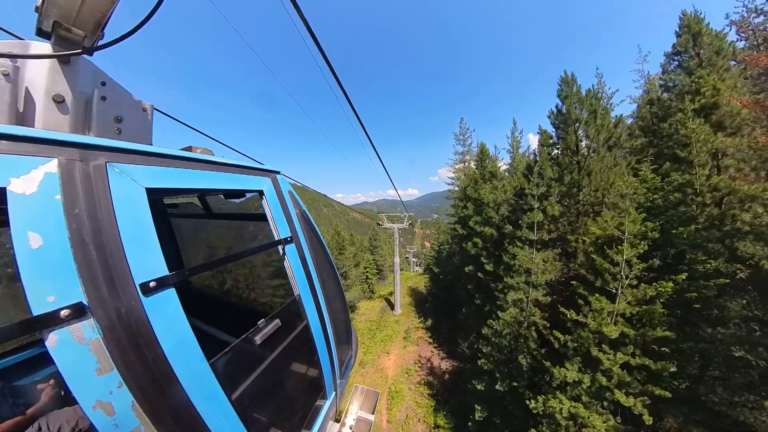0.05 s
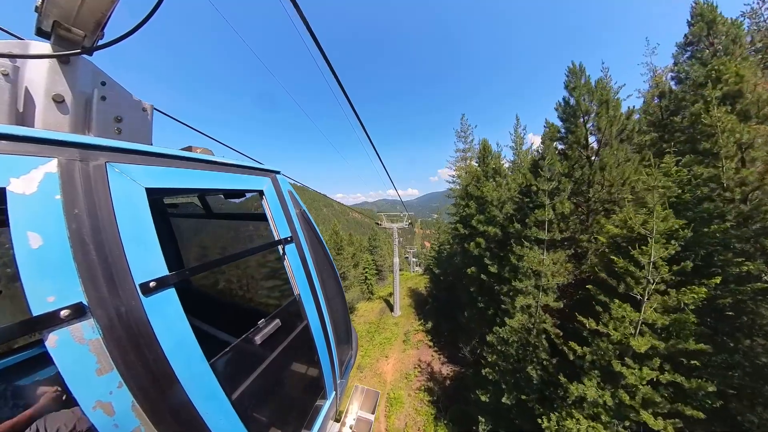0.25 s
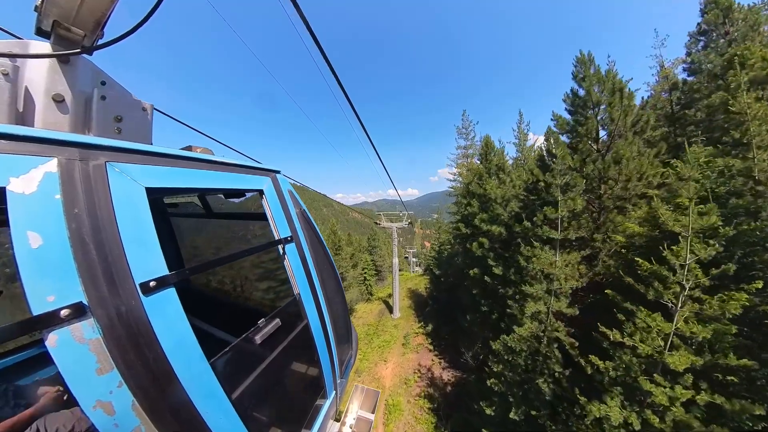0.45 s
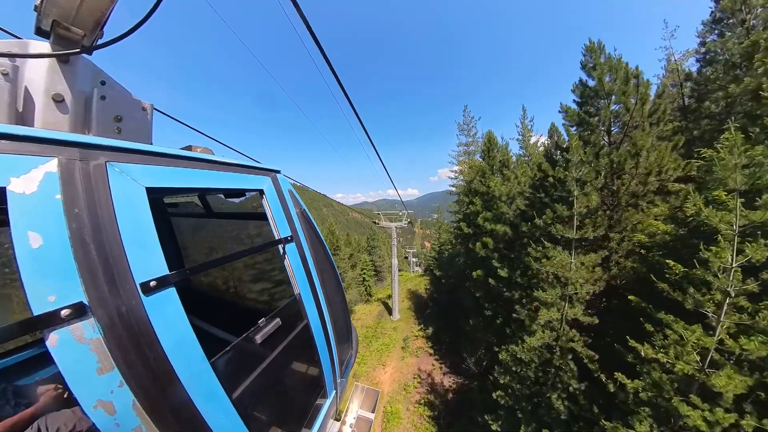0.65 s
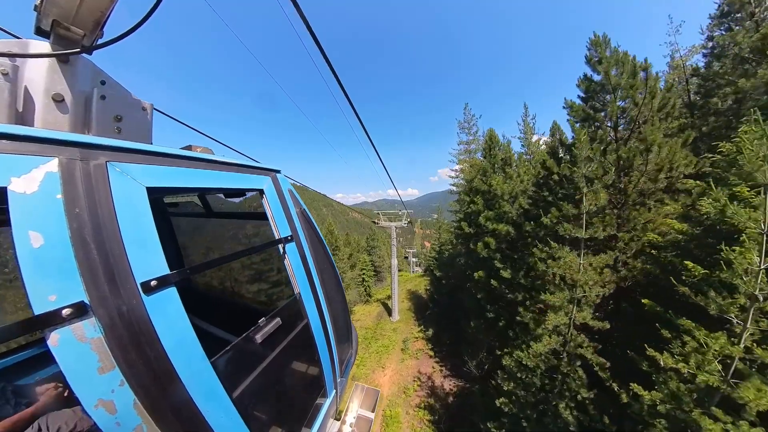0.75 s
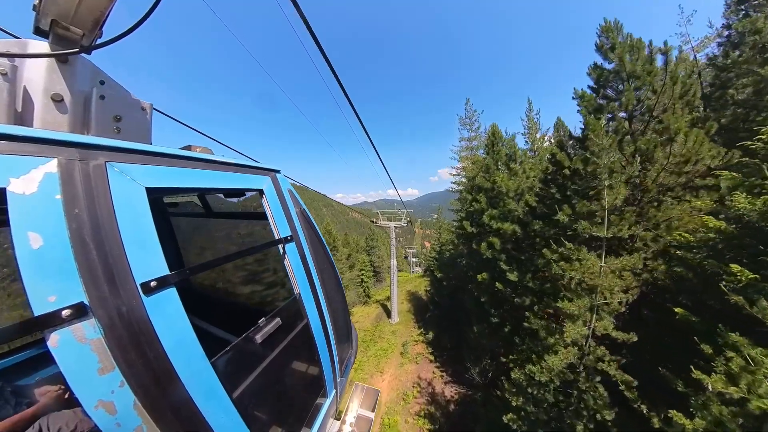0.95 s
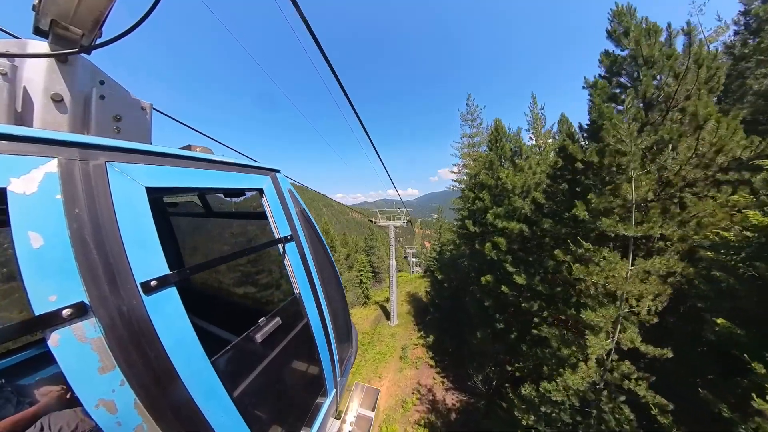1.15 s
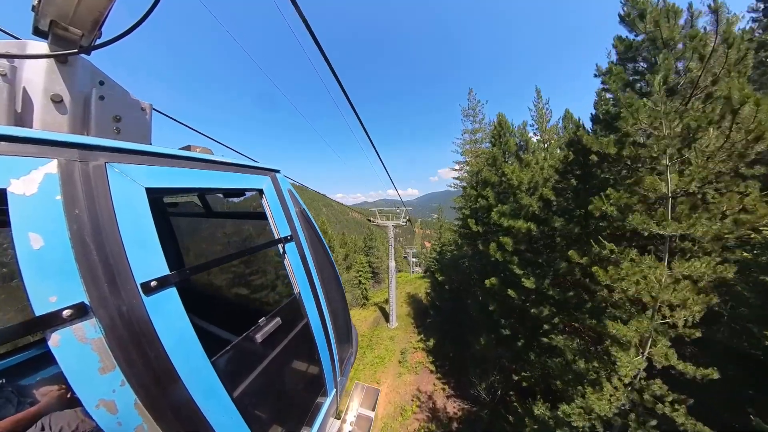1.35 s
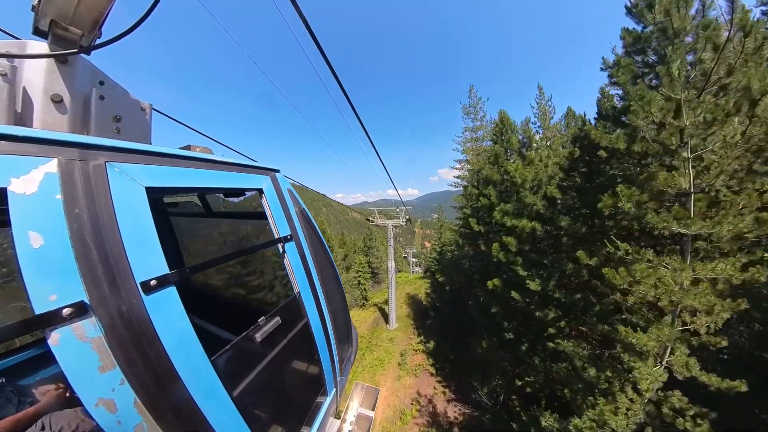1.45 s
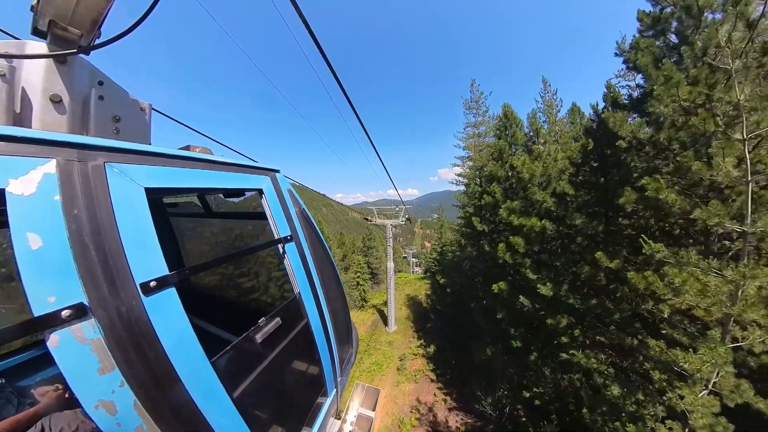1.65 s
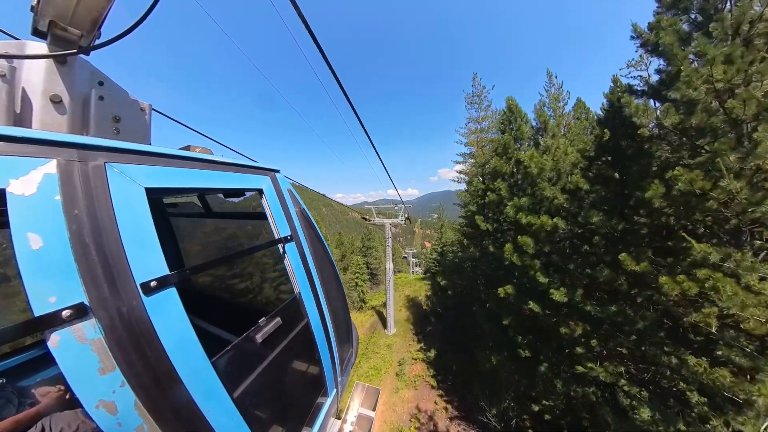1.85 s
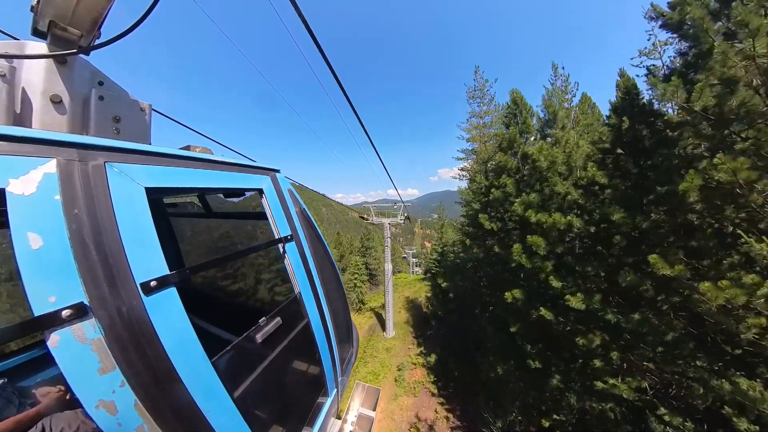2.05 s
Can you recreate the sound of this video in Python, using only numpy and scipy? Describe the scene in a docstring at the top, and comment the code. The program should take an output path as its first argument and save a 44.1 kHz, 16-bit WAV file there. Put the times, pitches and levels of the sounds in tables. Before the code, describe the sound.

A lift cabin runs along its haul rope outdoors: a low, unsteady hum under bassy wind rumble and buffeting on a small exposed microphone. Soft low thumps crowd the first half second, then thin out. A hollow howl hops between pitches, weakens around 0.7-0.9, then moans more continuously and strongly to 2 seconds. Very faint ticks recur about every 0.4 seconds; brief whistles flicker, and light hiss rises after 1.8.

```python
"""A lift cabin glides along its haul rope, heard from a small camera held outside in the moving air.
From the start the rope hums on one low wavering note, under coloured noise: wind that rumbles, buffets,
roars and hisses, and the microphone's own hiss on top. Eddies thump it as short low cycles, and an edge
howls in sines that hop between pitches. A fainter, rougher howl joins above, then steady faint ticks (a
ring and a noise snap) and brief whistles. Late on, a narrow band of noise hisses in the microphone port."""
import sys
import numpy as np
from scipy import signal
from scipy.fft import rfft, irfft, next_fast_len
from scipy.io import wavfile
from scipy.ndimage import uniform_filter1d, map_coordinates

SR = 44100
rng = np.random.default_rng(int(sys.argv[2]) if len(sys.argv) > 2 else 0)


def file_out(sig):
    """Save sig as 16-bit WAV at sys.argv[1]."""
    # one column per channel
    cols = np.atleast_2d(sig).T
    # limit, then scale
    lim = np.clip(cols, -1, 1)
    pcm = np.round(lim * 32767).astype(np.int16)
    wavfile.write(sys.argv[1], SR, pcm)


N = 91904  # length [samples]

# Rope hum: (time [s], level [dB])
ROPE_LEVEL = [(0.03, -32.5), (0.2, -52), (0.38, -29.5), (0.43, -34.5), (0.68, -28), (0.92, -28.5),
              (1.07, -43.5), (1.14, -31.5), (1.25, -29.5), (1.42, -37.5), (1.46, -29), (1.61, -27.5),
              (1.8, -37.5), (1.93, -28), (2.02, -27.5), (2.08, -31)]
ROPE_HZ = 111.5

# Wind rumble over time: (time [s], level [dB])
RUMBLE_LEVEL = [(0.03, -36), (0.16, -38.5), (0.23, -33), (0.5, -38), (0.57, -37.5), (1.37, -38.5),
                (1.43, -46), (1.47, -34), (1.52, -43.5), (2.08, -38.5)]
# Rumble colour: (frequency [Hz], relative density [dB per Hz])
RUMBLE_COLOUR = [(8.8, -49), (15, -29), (48, 1.5), (81, 0), (95, -11.5), (120, -36), (210, -120)]

# Mid wind over time: (time [s], buffeting level [dB], roar level [dB])
BUFFET_ROAR_LEVEL = [(0.01, -21.5, -79), (0.02, -30, -68), (0.07, -32.5, -67), (0.23, -28, -63),
                     (0.24, -27.5, -54), (0.29, -33.5, -65.5), (0.38, -31, -57.5), (0.45, -27.5, -56),
                     (0.6, -37, -63.5), (0.84, -36, -64.5), (0.865, -44, -65), (0.9, -36.5, -65),
                     (1.0, -36.5, -67), (1.02, -34.5, -64.5), (1.28, -39, -64.5), (1.41, -39, -62),
                     (1.54, -32.5, -61.5), (1.57, -35, -65), (1.77, -36.5, -62), (1.91, -33.5, -51),
                     (1.95, -36.5, -58), (2.08, -36, -56.5)]
# Buffeting colour: (frequency [Hz], relative density [dB per Hz])
BUFFET_COLOUR = [(60, -32), (95, -14), (140, 4), (250, 0), (320, -7), (450, -8), (600, -14.5), (750, -26.5),
                 (1000, -37.5)]
# Colour of the roar, pitched above the howl: (frequency [Hz], relative density [dB per Hz])
ROAR_COLOUR = [(500, -35), (700, -2), (900, 2.5), (1200, 0.5), (1450, -9.5), (1600, -37), (2000, -62.5)]

# Hiss over time: (time [s], lower air level [dB], middle air level [dB], microphone hiss level [dB])
HISS_LEVEL = [(.03, -73, -83, -75), (.18, -72, -82, -72), (.3, -71.5, -87, -71.5), (.38, -67, -78.5, -70.5),
              (.42, -65.5, -77, -71), (.47, -68, -71, -69.5), (.54, -67, -74, -74.5),
              (.62, -68.5, -84, -73.5), (.82, -69.5, -79.5, -75), (.98, -68.5, -81, -76.5),
              (1.04, -67, -75, -71.5), (1.14, -69, -78.5, -71.5), (1.2, -66.5, -79, -73),
              (1.26, -69.5, -79, -72.5), (1.36, -67.5, -77, -74), (1.45, -67.5, -77, -73),
              (1.5, -65, -78, -71), (1.58, -75, -86, -74), (1.635, -65, -77, -71), (1.68, -71, -77, -74),
              (1.72, -65.5, -68, -70.5), (1.8, -65.5, -71.5, -70), (1.9, -60.5, -70, -70),
              (2.08, -60.5, -67.5, -66)]
# Lower air hiss colour: (frequency [Hz], relative density [dB per Hz])
LOWER_HISS_COLOUR = [(850, -35), (1450, -3), (1680, -8), (2010, -0.5), (2230, -4.5), (2470, -5), (2950, -8),
                     (3550, -6), (4050, -3), (4350, -8), (4800, -21.5), (6240, -35), (10600, -120)]
# Middle air hiss colour: (frequency [Hz], relative density [dB per Hz])
MIDDLE_HISS_COLOUR = [(2760, -30.5), (4700, -1.5), (5510, -1.5), (5920, -2.5), (6440, -5.5), (7600, -5),
                      (9880, -30), (16700, -120)]
# Colour of the microphone's own hiss: (frequency [Hz], relative density [dB per Hz])
MICROPHONE_HISS_COLOUR = [(4410, -29.5), (7500, -10), (8850, 0), (10700, -13), (14000, -40), (22000, -120)]
SWELL_DB = 1.0  # depth of the random swells in the hiss

# Eddies on the microphone: (centre time [s], length [s], pitch [Hz], envelope peak [dB])
THUMPS = [(.025, 0.014, 175, -16), (.06, 0.049, 115, -25), (.22, 0.049, 226.6, -27), (.26, 0.022, 175, -18),
          (.35, 0.013, 220, -24), (.38, 0.011, 155, -16.5), (.41, 0.065, 232.4, -26.5),
          (.14, 0.024, 177.6, -24), (.46, 0.056, 194, -28.5), (.5, 0.022, 322, -32.5),
          (.7, 0.049, 116.5, -19.5), (1.04, 0.055, 141, -30), (1.125, 0.036, 166.6, -27.5),
          (1.34, 0.012, 106, -22.5), (1.52, 0.066, 168, -26)]

# The howl, one list for each stretch it holds a pitch: (time [s], pitch [Hz], level [dB])
HOWLS = [
    [(0.05, 595, -44), (0.064, 582, -39.5), (0.1, 615.6, -35), (0.14, 620, -42)],
    [(0.15, 539.2, -38), (0.17, 527, -35.5), (0.182, 537.6, -37), (0.208, 537, -35), (0.222, 509, -47),
     (0.238, 524.3, -37), (0.252, 503.4, -27.5), (0.266, 525, -33), (0.28, 497, -42), (0.296, 486, -31),
     (0.335, 497, -34)],
    [(0.325, 579.2, -43), (0.337, 581.5, -30.5), (0.415, 564, -31), (0.439, 606.3, -34.5),
     (0.471, 542.6, -33.5), (0.479, 583.6, -37.5), (0.525, 590, -34.5), (0.593, 545, -36),
     (0.605, 550, -50), (0.621, 514, -44), (0.63, 547, -53)],
    [(.71, 497.4, -49.5), (.735, 517.3, -44.5), (.75, 521, -45), (.765, 519, -38.5), (.797, 545, -36),
     (.805, 514, -55), (.815, 500, -46), (.828, 468, -48), (.842, 470, -44), (.855, 486, -54.5),
     (.88, 510, -53)],
    [(0.92, 480.9, -44.5), (0.938, 475, -39.5), (1.006, 521.5, -37), (1.058, 519, -34), (1.07, 544, -44),
     (1.096, 505.3, -36), (1.126, 510.4, -41), (1.184, 498.3, -33), (1.206, 483, -44.5),
     (1.222, 530, -35.5), (1.27, 519, -37), (1.284, 509.4, -41.5), (1.3, 512, -34), (1.358, 497.7, -37.5),
     (1.384, 500.4, -31), (1.43, 464, -45.5), (1.448, 473, -33), (1.466, 514.7, -33), (1.498, 503, -30.5),
     (1.514, 545.2, -41.5), (1.524, 525.4, -31.5), (1.55, 520.4, -31), (1.566, 522.5, -35.5),
     (1.582, 482, -31), (1.598, 463.8, -47.5), (1.672, 502, -29), (1.684, 498.5, -41),
     (1.718, 492.5, -33.5), (1.756, 467.6, -29.5), (1.768, 483.4, -38.5), (1.782, 486.6, -33.5),
     (1.862, 492.2, -31), (1.946, 466.4, -32), (1.978, 483.7, -41.5), (2.004, 449, -25.5),
     (2.046, 458.7, -33.5), (2.08, 461, -26)],
]
# A fainter, rougher howl above it, one list a stretch: (time [s], pitch [Hz], level [dB])
UPPER_HOWLS = [
    [(0.115, 700, -57), (0.121, 708, -60), (0.131, 769, -57), (0.153, 775, -50), (0.169, 742, -46.5),
     (0.207, 745, -56), (0.225, 771, -46), (0.235, 778, -48.5), (0.243, 741, -50), (0.259, 726, -54),
     (0.27, 714.1, -50)],
    [(0.295, 750, -51), (0.323, 766, -49.5), (0.373, 822, -51), (0.381, 831, -45.5), (0.399, 803, -45),
     (0.413, 814, -53), (0.429, 809, -53), (0.445, 772, -46), (0.517, 791, -57), (0.523, 773, -42.5),
     (0.58, 767.8, -59.5)],
]
FADE_S, OCTAVE_DB = 0.019, -32  # fade at either end of a howl or whistle; its second harmonic
GRIT_RATE = 110  # flicker of a tone's rough skirt [knots per s]

# Cabin ticks: (start time [s], gain before the envelope [dB])
TICKS = [(0.1845, -46), (0.6027, -51), (1.0144, -49), (1.4382, -49.5)]
TICK_HZ, TICK_T60_S, TICK_RISE_S = 8520, 0.019, 0.0041
SNAP_DB, SNAP_LOW_HZ = -3.5, 3500  # the broad snap in each tick, and its low edge

# Short whistles: (start time [s], length [s], first pitch [Hz], last pitch [Hz], level before fades [dB])
WHISTLES = [(0.224, 0.04, 1080, 1020, -59), (0.229, 0.035, 598, 590, -36.5), (0.24, 0.024, 1148, 1100, -58),
            (0.397, 0.017, 900, 960, -48.5), (0.639, 0.018, 430, 400, -42.5),
            (0.76, 0.031, 390, 410, -48.5), (0.667, 0.077, 409.7, 380, -38), (0.889, 0.025, 385, 355, -35),
            (1.039, 0.11, 697, 650, -57), (1.229, 0.03, 688, 713, -49), (1.493, 0.047, 658, 656, -51),
            (1.677, 0.022, 555, 606, -44.5), (1.808, .15, 987, 985, -62), (1.755, 0.017, 613, 625.8, -42.5),
            (1.836, 0.1085, 285.2, 248.5, -35), (1.965, 0.026, 591, 600, -47.5),
            (2.03, 0.018, 601.8, 560, -43), (2.042, 0.032, 1183, 1156, -56)]

# Narrow hiss of the microphone port: (time [s], level [dB])
PORT_LEVEL = [(1.8, -75), (1.848, -66.5), (1.886, -70), (1.928, -61.5), (2.056, -63.5), (2.08, -64)]
PORT_HZ, PORT_WIDTH_HZ = 4294, 310  # centre, and width between half-gain points

TOP_HZ = 10900  # band limit of the camera


def amp(db):
    """Decibels to gain."""
    return 10 ** (np.asarray(db) / 20)


def unit(x):
    """Scale to rms 1."""
    return x / np.sqrt(np.mean(x ** 2) + 1e-20)


def curves(rows):
    """One value per sample for each column after the time."""
    times, *columns = np.transpose(rows)
    return [np.interp(np.arange(N) / SR, times, column) for column in columns]


def wobble(rate):
    """A smooth random curve through rate knots a second."""
    knots = rng.standard_normal(2000)
    return map_coordinates(knots, [np.arange(N) * rate / SR])


def filtered(x, response):
    """Shape the spectrum of x by a response of frequency."""
    size = next_fast_len(N + SR // 2)
    gain = response(np.fft.rfftfreq(size, 1 / SR))
    return irfft(rfft(x, size) * gain, size)[..., :N]


def gate(start, end):
    """Soft on and soft off, at half gain on the start and end times."""
    t = np.arange(N) / SR
    ramp = np.minimum(t - start, end - t) / FADE_S + .5
    return np.sin(np.pi / 2 * np.clip(ramp, 0, 1)) ** 2


def rush(colour, patchy_db, size):
    """Coloured noise of rms 1, with random gain in patches of time and frequency."""
    bins = signal.stft(rng.standard_normal(N), nperseg=size)[2]
    patches = uniform_filter1d(rng.standard_normal(bins.shape), size=3, axis=0)  # across frequency
    patches = uniform_filter1d(patches, size=5, axis=1)  # across time
    noise = signal.istft(bins * amp(patchy_db * unit(patches)), nperseg=size)[1][:N]
    # steep skirts beyond both ends of the colour
    points = [(colour[0][0] * .7, -90), *colour, (colour[-1][0] * 1.1, -120)]
    f, db = np.transpose(points)
    return unit(filtered(noise, lambda hz: amp(np.interp(np.log(hz + 1), np.log(f + 1), db))))


def tone(hz, level_db, waver_hz, flutter_db, rate, octave_db, rough):
    """A sine of wavering pitch and fluttering level, with a second harmonic and a skirt of noise."""
    phase = 2 * np.pi * np.cumsum(hz + waver_hz * wobble(rate)) / SR
    skirt = wobble(GRIT_RATE) * np.sin(phase) + wobble(GRIT_RATE) * np.cos(phase)
    wave = np.sin(phase) + amp(octave_db) * np.sin(2 * phase) + rough * skirt
    gain = np.sqrt(2) * amp(level_db + flutter_db * wobble(rate))  # sqrt(2): sine level as rms
    return gain * wave


def rope():
    """The haul rope's vibration, heard through the grip as one low hum."""
    level_db, = curves(ROPE_LEVEL)
    return tone(ROPE_HZ, level_db, waver_hz=1.05, flutter_db=-0.5, rate=24, octave_db=-37, rough=0.01)


def rumble():
    """The lowest turbulence of the air over the microphone."""
    level_db, = curves(RUMBLE_LEVEL)
    return amp(level_db) * rush(RUMBLE_COLOUR, patchy_db=.5, size=2048)


def buffeting_and_roar(lumps):
    """Lumpy turbulence: low buffeting and a higher roar swell on the same random lumps."""
    buffet_db, roar_db = curves(BUFFET_ROAR_LEVEL)
    buffet = amp(buffet_db + 2.56 * lumps) * rush(BUFFET_COLOUR, patchy_db=0.0, size=2048)
    roar = amp(roar_db + 0.98 * lumps) * rush(ROAR_COLOUR, patchy_db=2.5, size=1024)
    return buffet + roar


def hiss(swells):
    """Hiss in three bands: air noise in the lower and middle, the microphone's own hiss on top."""
    lower_db, middle_db, microphone_db = curves(HISS_LEVEL)
    swell_db = SWELL_DB * swells
    lower = amp(lower_db + swell_db) * rush(LOWER_HISS_COLOUR, patchy_db=4.0, size=1024)
    middle = amp(middle_db + swell_db) * rush(MIDDLE_HISS_COLOUR, patchy_db=4.0, size=512)
    microphone = amp(microphone_db + swell_db) * rush(MICROPHONE_HISS_COLOUR, patchy_db=4.0, size=512)
    return lower + middle + microphone


def wind_and_hiss():
    """Air rumbling, buffeting and roaring over the microphone, with the hiss of both air and microphone."""
    lumps, swells = wobble(30.13), wobble(14)
    return rumble() + buffeting_and_roar(lumps) + hiss(swells)


def thumps():
    """Each eddy pushes the microphone through a few soft low cycles in a bell-shaped envelope."""
    t = np.arange(N) / SR
    out = np.zeros(N)
    for centre, length, hz, db in THUMPS:
        bell = np.exp(-(2 * (t - centre) / length) ** 2)
        out += amp(db) * bell * np.sin(2 * np.pi * (hz * (t - centre) + rng.random()))
    return out


def edge_tone(rows, waver_hz, flutter_db, rough):
    """Air shedding vortices from an edge: one faded tone along (time [s], pitch [Hz], level [dB])."""
    hz, level_db = curves(rows)
    sound = tone(hz, level_db, waver_hz, flutter_db, rate=45, octave_db=OCTAVE_DB, rough=rough)
    return gate(rows[0][0], rows[-1][0]) * sound


def howl():
    """Vortices shed from an edge lock on one pitch for a while, then hop."""
    return sum(edge_tone(rows, waver_hz=3.86, flutter_db=0.9, rough=0.19) for rows in HOWLS)


def upper_howl():
    """A fainter howl above, its vortices less regular in pitch and level."""
    return sum(edge_tone(rows, waver_hz=7.3, flutter_db=2.0, rough=0.38) for rows in UPPER_HOWLS)


def ticks():
    """Something on the cabin ticks: a short bright ring and a broad snap share one decay."""
    out, t = np.zeros(N), np.arange(SR // 10) / SR
    envelope = amp(-60 * t / TICK_T60_S) * (1 - np.exp(-t / TICK_RISE_S))
    ring = np.sin(2 * np.pi * TICK_HZ * t)
    snap = filtered(rng.standard_normal(N), lambda hz: 1 / (1 + (SNAP_LOW_HZ / (hz + 1)) ** 4))
    for start, db in TICKS:
        span = slice(round(start * SR), round(start * SR) + len(t))
        out[span] += amp(db) * envelope * (ring + amp(SNAP_DB) * snap[span])
    return out


def whistles():
    """Brief edge tones beside the howl, each gliding from its first pitch to its last."""
    out = np.zeros(N)
    for start, length, first_hz, last_hz, db in WHISTLES:
        glide = [(start, first_hz, db), (start + length, last_hz, db)]
        out += edge_tone(glide, waver_hz=8.4, flutter_db=1.0, rough=0.17)
    return out


def port_hiss():
    """Wind in the microphone port: noise through one narrow resonance."""
    level_db, = curves(PORT_LEVEL)
    resonance = lambda hz: 1 / (1 + (2 * (hz - PORT_HZ) / PORT_WIDTH_HZ) ** 2)
    ring = unit(filtered(rng.standard_normal(N), resonance))
    opening = gate(PORT_LEVEL[0][0], PORT_LEVEL[-1][0] + 1)  # stays open to the end
    return opening * amp(level_db) * ring


def scene():
    """All sources at the one microphone."""
    tones = rope() + howl() + upper_howl() + whistles()
    noises = wind_and_hiss() + port_hiss() + thumps()
    return (tones + noises + ticks())[None]


def record(dry):
    """The camera keeps nothing above its band limit."""
    return filtered(dry, lambda hz: hz < TOP_HZ)


dry = scene()
out = record(dry)
file_out(out)
```